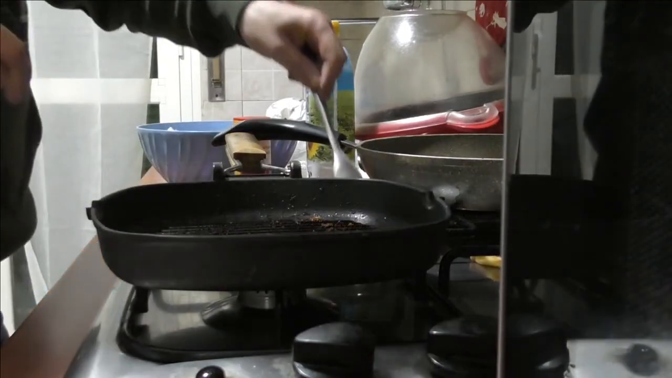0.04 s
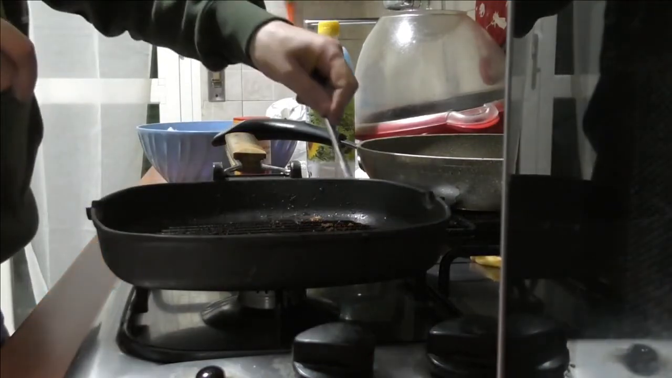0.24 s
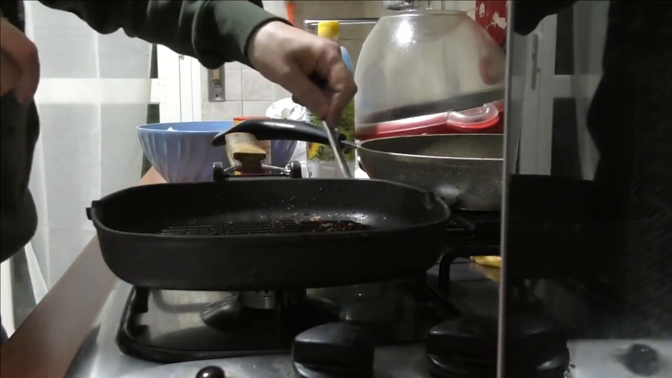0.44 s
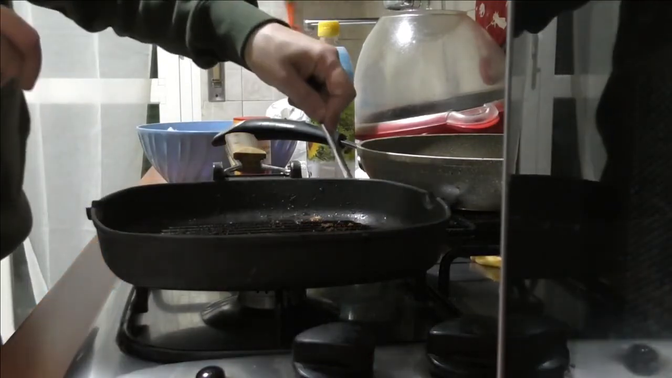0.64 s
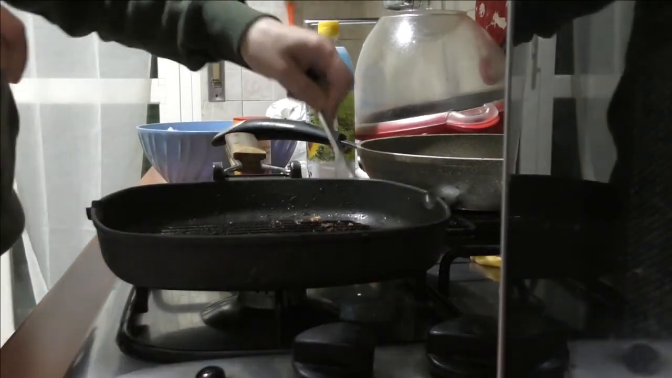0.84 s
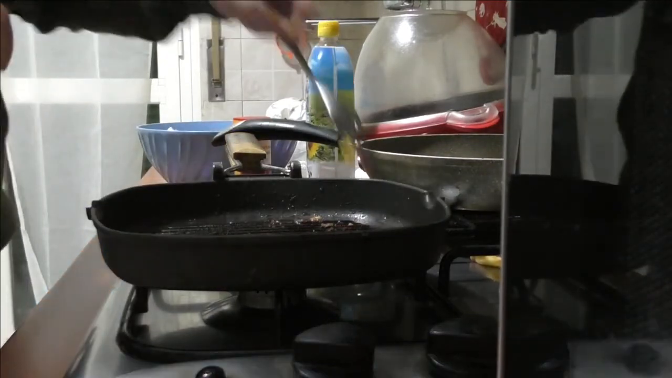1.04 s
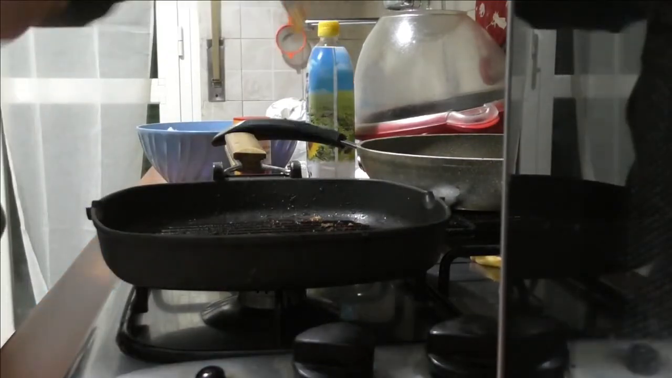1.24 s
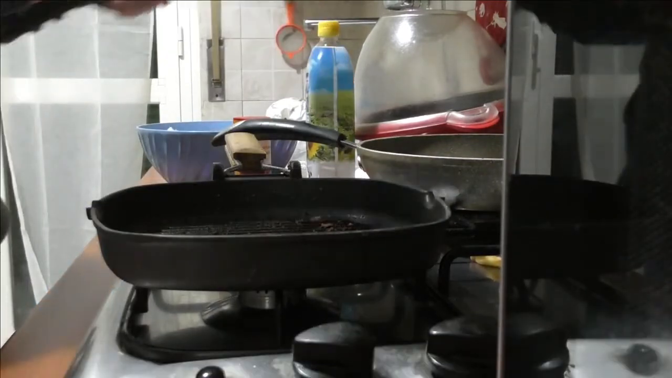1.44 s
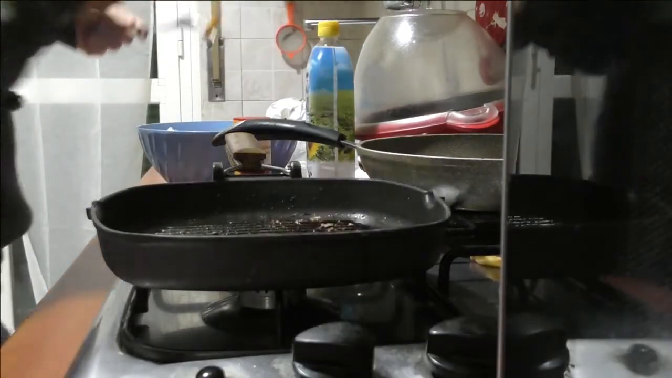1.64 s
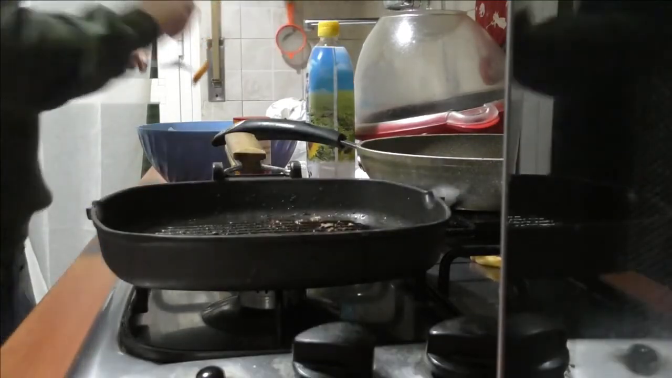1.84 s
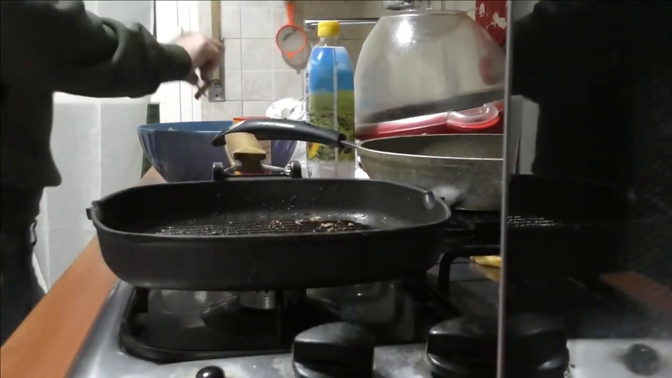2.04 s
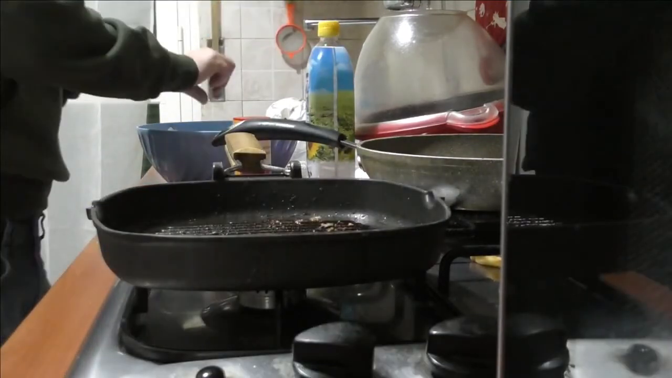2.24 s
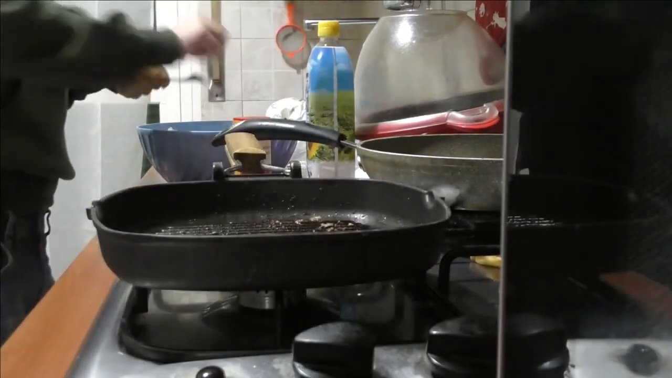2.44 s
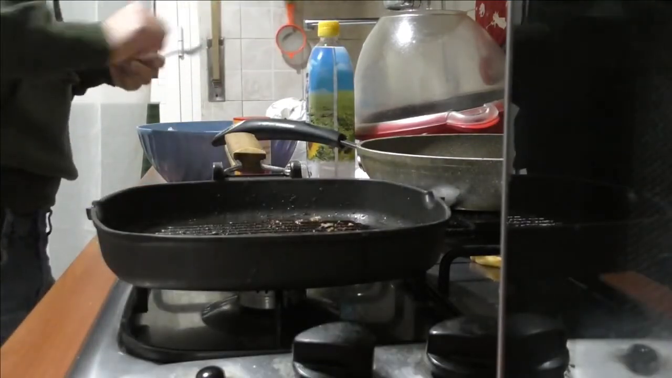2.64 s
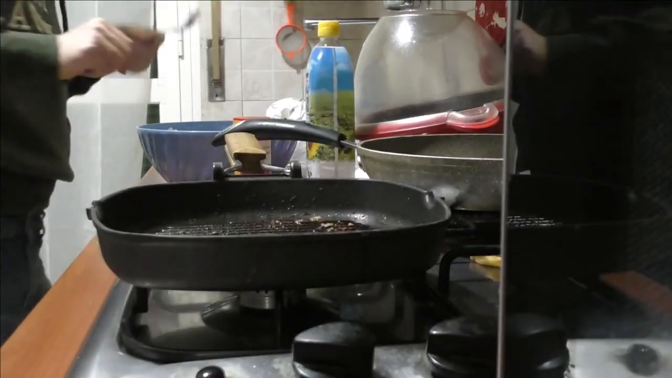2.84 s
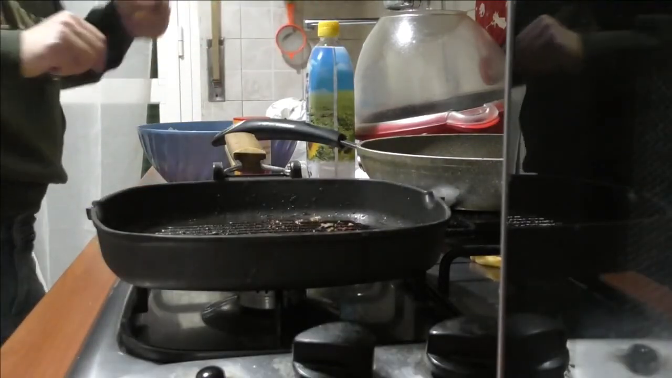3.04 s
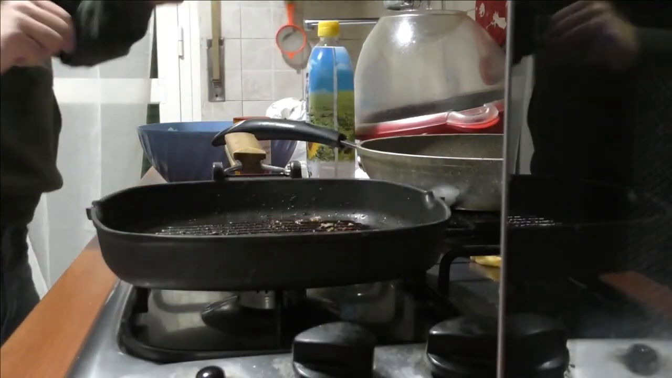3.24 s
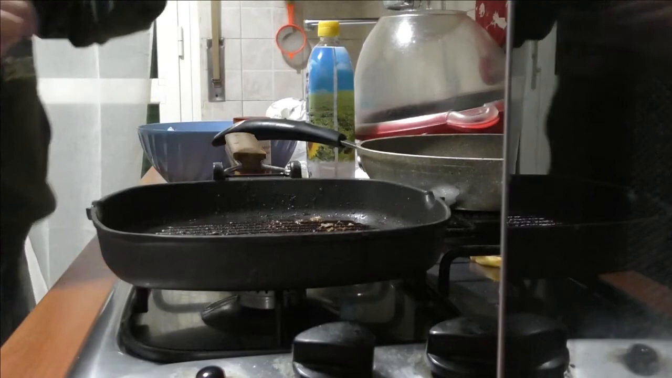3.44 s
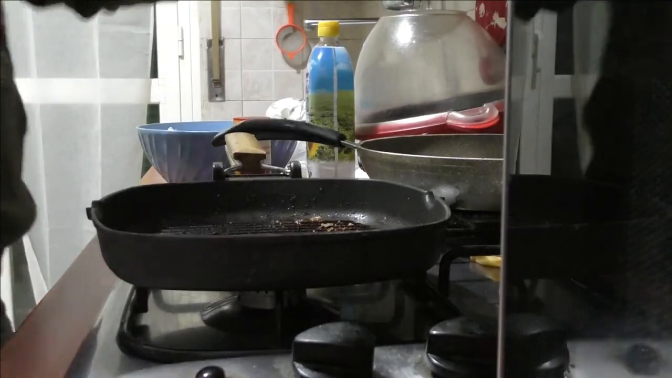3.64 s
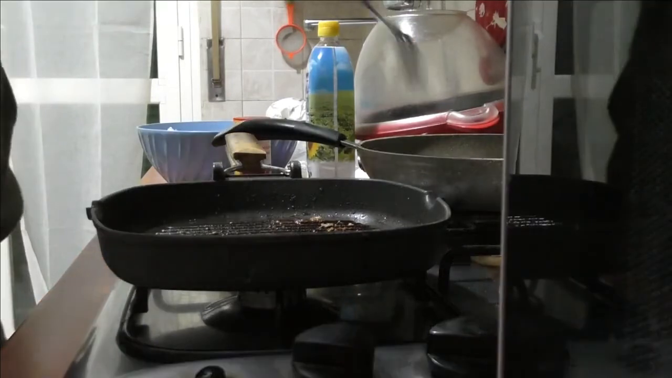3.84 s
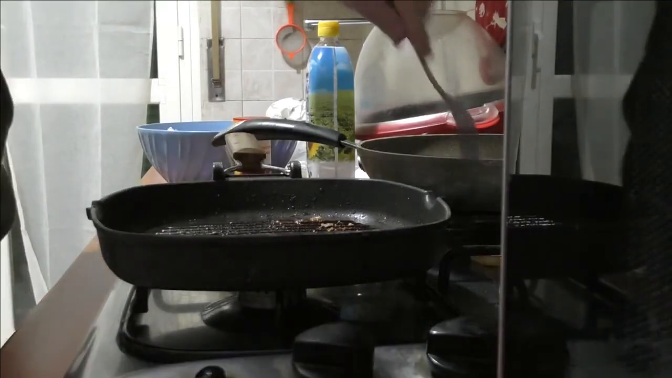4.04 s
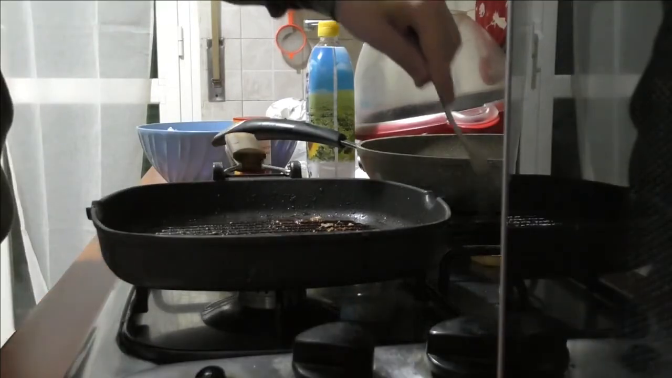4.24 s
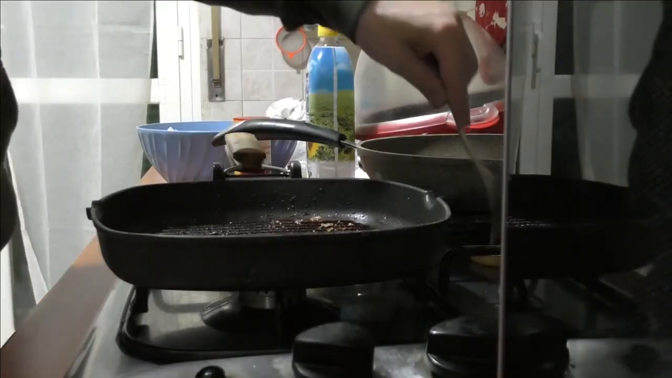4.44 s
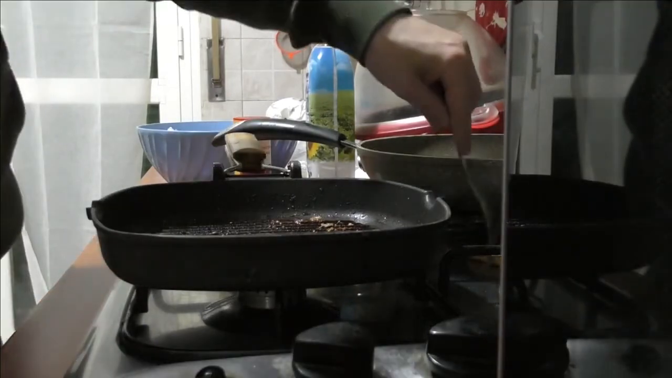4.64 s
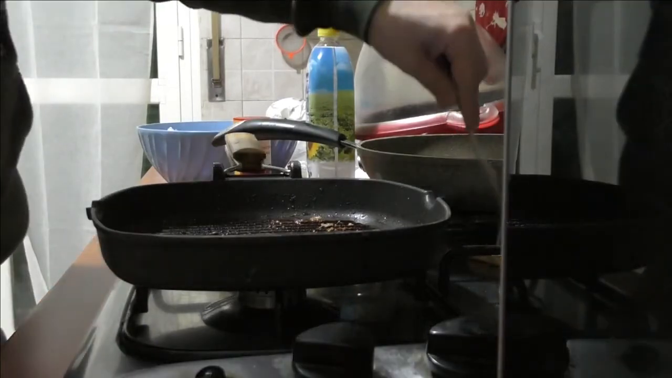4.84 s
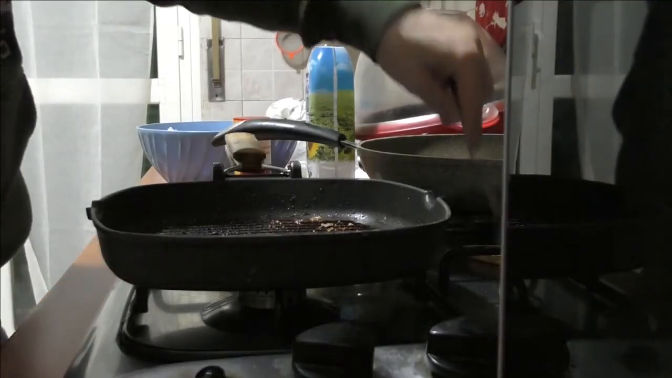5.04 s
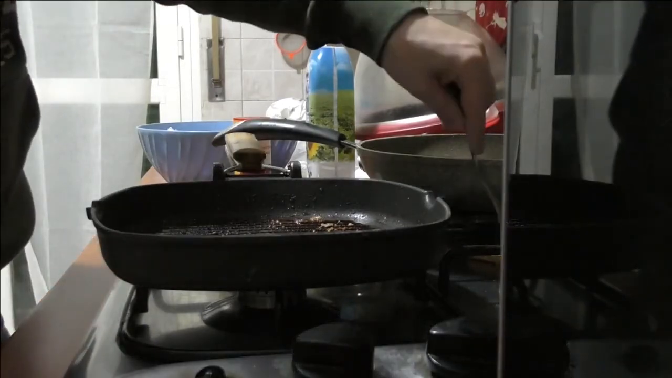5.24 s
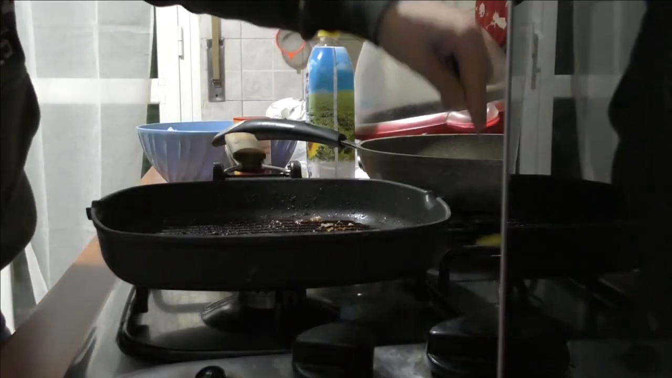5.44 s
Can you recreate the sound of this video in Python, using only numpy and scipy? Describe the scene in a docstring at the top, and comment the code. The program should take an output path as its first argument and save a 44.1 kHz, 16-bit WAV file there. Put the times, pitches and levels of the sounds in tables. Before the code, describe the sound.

In the first second, a fork prods food in a frying pan close by, with muffled clanks and low thuds, strongest at 0.2 and 0.6 seconds. From about 1.6 to 2.7 seconds, soft slippers thump and slide away, hissing and juddering slightly over a gritty floor. Something small and hard clacks at 2.2 seconds. The feet shuffle back from 3.4 to 4 seconds, with a brisk swish at 3.8. At about 4.6 and 5.1 seconds the fork knocks hard on the pan. These are the loudest sounds, each a steel crack with a short ring, a low boom from the stove and a brief echo off the tiles. A light tap follows at 5.3. Throughout, a wall clock ticks faintly once a second and the food gives rare tiny crackles over a very quiet low room rumble and hum. A faint thin whistle stops near 2.8 seconds.

```python
"""A fork prods food in a frying pan close by, with dull clanks, and near the end knocks twice on the pan:
a steel crack, a short ring and a boom from the hob. In between, the cook shuffles away and back, soft
soles thumping, hissing over grit and juddering, and something small clacks in the cook's hands.
The food crackles faintly, a wall clock ticks across the room, and the tiled kitchen rings briefly
over a low murmur, a hum and a thin whistle that stops halfway."""
import sys
import numpy as np
from scipy import signal
from scipy.io import wavfile

SR = 44100
rng = np.random.default_rng(int(sys.argv[2]) if len(sys.argv) > 2 else 0)


def master_out(mix):
    """Clip the mix to full scale and print it as 16-bit PCM to the path in sys.argv[1]."""
    frames = np.transpose(np.atleast_2d(mix))
    ceiling = np.clip(frames, -1, 1)
    pcm = np.round(ceiling * 32767).astype(np.int16)
    wavfile.write(sys.argv[1], SR, pcm)


N = 242837
T = np.arange(N) / SR
AGE = T[:SR]  # time since a contact [s]

# bright tick of a tiny contact: (frequency [Hz], level [dB])
BRIGHT_TICK = [(500, -33), (2500, 2.5), (5200, -7), (7500, -3), (11000, 2.5), (15500, -5.5)]
# a sole scuffing the floor: (frequency [Hz], level [dB])
SCUFF_SPECTRUM = [(100, -11.5), (350, 2), (650, -7.5), (1200, -1), (2200, 0), (3000, -1.5), (4500, -5),
                  (8000, -12), (12000, -15), (15500, -25)]
# stereo width of the room: (frequency [Hz], side over mid [dB])
ROOM_WIDTH = [(60, -11.5), (150, -7), (350, -10.5), (600, -14), (1150, -9), (2300, -8), (5000, -7),
              (7000, -21.5), (15000, -39)]


def knocks(ring_t60=0.071, rattle_db=-11, ring_in_room_db=-7, boom_rise_s=0.051):
    """Steel on pan: a crack, a short rattle and a damped ring, while the hob booms and the room answers."""
    # hard fork hits: (time [s], crack [dB], pan ring [dB], hob boom [dB], crack sent to the room [dB])
    hits = [(4.6468, -19, -22, -38.5, -21.5), (5.083, -18, -23, -31, -19.5)]
    # crack of steel on steel: (frequency [Hz], level [dB])
    crack_spectrum = [(60, -23), (250, 8), (600, 2.5), (1200, 1), (2700, 3.5), (3600, 0.5), (5000, -6.5),
                      (7000, -1.5), (10500, -2), (15500, -9)]
    # modes of the pan, damped by its load: (frequency [Hz], level [dB])
    pan_modes = [(232, 0.5), (272, -5), (446, 5), (610, -14), (722, -6), (882, 1.5), (1125, 5.5),
                 (1174, -10), (1480, 1), (1760, -25), (2030, 2.5), (2120, -28), (2450, 3), (2622, 2.5),
                 (2843, -3.5), (3147, 0), (3394, -1.5), (3545, 2.5), (6480, -34), (6870, -6)]
    # modes of the hob under the pan: (frequency [Hz], level [dB], t60 [s])
    hob_modes = [(100, 1.5, 0.43), (122, -3, 0.34), (225, -12, 0.26), (291.5, 1, 0.59), (422, 3, 0.49),
                 (440, -2.5, 0.63)]
    near, room_send, boom = np.zeros((3, N))
    for s, crack_db, ring_db, boom_db, room_db in hits:
        crack = burst(crack_spectrum, t60=0.059, click=0.29)
        rattle = amp(rattle_db) * burst(crack_spectrum, t60=0.077)
        pan = amp(ring_db) * blow(ring([(hz, db, ring_t60) for hz, db in pan_modes]))
        add(near, s, amp(crack_db) * (crack + rattle) + pan)
        add(boom, s, amp(boom_db) * blow(ring(hob_modes) * attack(boom_rise_s)))
        snap = blow(colour(impulse(), crack_spectrum))
        add(room_send, s, amp(room_db) * snap + amp(ring_in_room_db) * pan)
    return direct(near) + boom + kitchen(room_send, build_s=0.064)


def prods(press_db=-3, swell_db=9, slip_s=0.0105, slip_db=-2, ring_db=-6,
          give_s=0.00389, rock_s=0.0155, rock_db=-1):
    """Cushioned by food, the fork presses in, ticks, clanks dully and rocks the pan on its grate."""
    # fork jabs: (contact time [s], press before it [s], thud [dB], clank [dB], tick of the tines [dB])
    jabs = [(.2135, 0.0054, -38.5, -41, -38.5), (0.3747, 0.00087, -70, -60, -60),
            (0.559, 0.011, -51, -52.5, -60), (.6055, .012, -49, -37.5, -58),
            (.617, 0.0027, -35, -33, -45.5), (.79, .005, -60, -53, -60), (.835, 0.0041, -53.5, -52.5, -70),
            (.9747, .002, -59, -59.5, -75), (4.2156, .001, -65, -77, -61),
            (4.6048, 0.0077, -40.5, -40, -47.5), (4.639, 0.015, -38.5, -34, -60),
            (5.0457, 0.00303, -33.5, -35.5, -45), (5.276, .003, -48.5, -48, -46)]
    # thud of the pan on its grate: (frequency [Hz], level [dB])
    thud_spectrum = [(40, -22), (95, 6.5), (140, -1.5), (190, -5), (320, 2.5), (440, -1), (600, -17.5),
                     (1200, -51), (4000, -55)]
    # muffled clank of fork on pan: (frequency [Hz], level [dB])
    clank_spectrum = [(200, -16), (520, -8), (760, -1.5), (950, -3.5), (1500, 1.5), (1900, -6.5),
                      (2700, -9), (4500, -20.5), (15000, -29.5)]
    # ring after a clank: (frequency [Hz], level [dB], t60 [s])
    clank_modes = [(901.4, -9, 0.2), (1340, -0.5, 0.028), (1708, -15, 0.15)]
    contacts, rings = np.zeros((2, N))
    for s, press_s, thud_db, clank_db, tick_db in jabs:
        # the squeeze through the food grows louder until the fork meets the pan
        swell = (AGE < press_s) * amp(swell_db * np.minimum(AGE / press_s - 1, 0))
        press = unit_colour(swell * rng.standard_normal(SR), clank_spectrum)
        add(contacts, s - press_s, amp(clank_db + press_db) * press)
        add(contacts, s, amp(tick_db) * burst(BRIGHT_TICK, t60=0.097, click=0.29))
        for delay, db in [(0, clank_db), (slip_s, clank_db + slip_db)]:  # the tines slip and clank again
            add(contacts, s + delay, amp(db) * burst(clank_spectrum, t60=0.1))
            add(rings, s + delay, amp(db + ring_db) * blow(ring(clank_modes)))
        for k in range(3):  # the pan gives way and rocks, each thud softer
            thud = burst(thud_spectrum, t60=0.096, click=0.77)
            add(contacts, s + give_s + k * rock_s, amp(thud_db + k * rock_db) * thud)
    return rings + heard(contacts, direct_db=-2, room_db=-3, build_s=0.0051)


def steps(toe_s=0.025, toe_db=-3, toe_pitch=0.96, pat_db=-8, thump_in_room_db=-9):
    """Soft soles land heel then toe: a dull, mostly dry thump and a gritty pat that fills the room."""
    # heel landings: (time [s], level [dB], thump pitch [Hz])
    footfalls = [(1.583, -49.5, 516), (1.67, -53.5, 320), (1.744, -42, 275), (1.949, -49.5, 318),
                 (2.24, -47.5, 213), (3.407, -51, 235)]
    thumps, pats = np.zeros((2, N))
    for s, heel_db, heel_hz in footfalls:
        for delay, db, hz in [(0, heel_db, heel_hz), (toe_s, heel_db + toe_db, heel_hz * toe_pitch)]:
            add(thumps, s + delay, amp(db) * thump(hz, width_hz=326, t60=0.06))
            hardness = hz / 600  # a harder landing thumps higher and pats louder
            pat = burst(SCUFF_SPECTRUM, t60=0.022, click=0.27)
            add(pats, s + delay, amp(db + pat_db) * hardness * pat)
    return thumps + heard(pats + amp(thump_in_room_db) * thumps, direct_db=-3.5, room_db=6.5, build_s=0.0089)


def slides(grains_per_s=1500, grain_spread_db=0.5, smooth_gain=0.78, pivot_hz=2200):
    """Grit under a sliding slipper hisses with its speed, each stroke with its own brightness."""
    # foot strokes: (time at full speed [s], rise [s], hold [s], t60 [s], level [dB], tilt [dB/octave])
    strokes = [(1.745, 0.097, 0.031, 0.22, -48.5, -2.5), (1.845, 0.086, 0.017, 0.33, -45, 1),
               (2.038, 0.11, 0.21, 0.52, -46, 0.5), (2.53, 0.45, 0.034, 0.41, -57, -0.5),
               (3.47, 0.13, .02, 0.49, -47.5, -1), (3.571, 0.067, 0.0056, 0.47, -42.5, 1.5),
               (3.784, 0.054, 0.089, 0.58, -37, -0.5)]
    powers = np.array([(amp(db) * foot_speed(*timing)) ** 2 for *timing, db, _ in strokes]) + 1e-14
    total_power = powers.sum(axis=0)
    tilt_db = np.array([tilt for *_, tilt in strokes]) @ powers / total_power  # the loudest stroke leads
    sizes = amp(grain_spread_db * np.minimum(rng.exponential(1, N), 4))
    grit = sizes * rng.choice([-1, 1], N) * (rng.random(N) < grains_per_s / SR)
    friction = unit(colour(unit(grit) + smooth_gain * rng.standard_normal(N), SCUFF_SPECTRUM))
    hz, times, bands = signal.stft(friction, SR, nperseg=256)
    octaves = np.log2(np.maximum(hz, 500) / pivot_hz)[:, None]
    hiss = signal.istft(bands * amp(octaves * np.interp(times, T, tilt_db)), SR)[1][:N]
    return np.sqrt(total_power) * hiss


def foot_speed(top_s, rise_s, hold_s, t60):
    """Speed of a sliding foot, 0-1: it gathers, holds and dies away."""
    rise = np.clip(1 + (T - top_s) / rise_s, 0, 1) ** 1.23
    return rise * amp(-60 * np.maximum(T - top_s - hold_s, 0) / t60)


def swish(width_hz=1100, fade_s=0.02):
    """The last drag of the foot: friction noise whose resonance rises as the foot speeds up."""
    # path of the sweep: (time [s], level [dB], centre [Hz])
    sweep = [(3.69, -45.5, 1050), (3.75, -47, 1210), (3.785, -29.5, 2210), (3.82, -34, 2300),
             (3.87, -49, 2150)]
    times, db, hz = np.transpose(sweep)
    gate = np.clip(np.minimum(T - times[0], times[-1] - T) / fade_s, 0, 1)
    return gate * amp(np.interp(T, times, db)) * band(np.interp(T, times, hz), width_hz)


def judders(width_hz=135, pitch_drop=0.3, skew=0.86, swell_power=0.51):
    """The sole sticks and slips: a low, rough drone that swells and rises with the foot's speed."""
    # spells of grip: (start [s], length [s], level [dB], top pitch [Hz])
    grips = [(1.752, .075, -51.5, 297), (1.916, 0.376, -47, 392), (3.487, 0.088, -47.5, 313),
             (3.71, .29, -52, 397)]
    out = np.zeros(N)
    for s, length_s, db, top_hz in grips:
        progress = np.clip((T - s) / length_s, 0, 1)
        arch = abs(np.sin(np.pi * progress ** skew))  # peaks a little early
        hz = top_hz * (1 - pitch_drop * (1 - arch))
        out += amp(db) * arch ** swell_power * band(hz, width_hz)
    return out


def clack(at_s=2.225, db=-41.5, tick_db=-1):
    """Something small and hard clacks in the cook's hands: one short resonance and a bright tick."""
    body = thump(hz=1183, width_hz=160, t60=0.037)
    tick = amp(tick_db) * burst(BRIGHT_TICK, t60=0.089, click=0.33)
    out = np.zeros(N)
    add(out, at_s, amp(db) * (body + tick))
    return heard(out, direct_db=0.5, room_db=0, build_s=0.01)


def clock(first_s=0.478, tick_db=-51.5, tock_early_s=0.017, tock_db=1.7,
          nudge_s=0.012, nudge_db=-5, settle_s=0.015, settle_db=-3):
    """Each second the wheel is nudged, the hand jumps and then settles."""
    # click of the clockwork: (frequency [Hz], level [dB])
    tick_spectrum = [(300, -19), (900, -2), (1300, 7.5), (1900, 4), (3200, -3), (5500, -4), (8000, -2),
                     (11000, -6), (15000, -17)]
    out = np.zeros(N)
    for second in range(N // SR + 1):
        tock = second % 2  # every other beat comes a little early and louder
        s = first_s + second - tock * tock_early_s
        db = tick_db + tock * tock_db
        for delay, extra_db in [(-nudge_s, nudge_db), (0, 0), (settle_s, settle_db)]:
            tick = burst(tick_spectrum, t60=0.079) * attack(rise_s=0.0044)
            add(out, s + delay, amp(db + extra_db) * tick)
    return out


def crackle(pops_per_s=3, db=-67, spread_db=3.5):
    """Rare tiny ticks from the food in the pan."""
    sizes = amp(spread_db * np.minimum(rng.exponential(1, N), 3))
    pops = sizes * (rng.random(N) < pops_per_s / SR)
    return amp(db) * signal.fftconvolve(pops, burst(BRIGHT_TICK, t60=0.04, click=0.3))[:N]


def room_tone(side_db=3, hum_db=-69, whistle_db=-69.5, whistle_end_s=2.84, whistle_fade_s=0.088):
    """Murmur and hiss, a faint wavering hum and a thin whistle that flickers and stops."""
    # low murmur with a hissy top: (frequency [Hz], level [dB])
    murmur_spectrum = [(20, -56), (45, -1), (110, 0.5), (230, 0), (400, -4), (510, -6), (590, -17),
                       (790, -14.5), (980, -5), (2400, -10), (4800, -19.5), (7500, -21.5), (10500, -17.5),
                       (15500, -21.5)]
    # slow drift of the murmur: (time [s], level [dB])
    murmur_drift = [(0, -58.5), (1.3, -57), (2.7, -57.5), (3.1, -59.5), (4.3, -61.5)]
    murmur_db = np.interp(T, *np.transpose(murmur_drift))
    mid, side = (unit(colour(noise, murmur_spectrum)) for noise in rng.standard_normal((2, N)))
    murmur = amp(murmur_db) * stereo(mid, amp(side_db) * side, ROOM_WIDTH)
    hum = amp(hum_db) * band(hz=50, width_hz=9)
    whistle = band(hz=2520, width_hz=150)
    flicker = 1 + 0.7 * np.tanh(band(hz=12, width_hz=8))
    fade = np.clip((whistle_end_s - T) / whistle_fade_s, 0, 1)
    return murmur + hum + amp(whistle_db) * fade * unit(whistle * flicker)


def kitchen(x, build_s):
    """Dense reflections off the tiles build up and die band by band."""
    # decay of the room: (frequency [Hz], t60 [s])
    decay_times = [(100, 0.76), (400, 0.39), (1200, 0.54), (2600, 0.44), (5000, 0.4), (9000, 0.33),
                   (15000, 0.32)]
    # tone of the reflections: (frequency [Hz], level [dB])
    tail_spectrum = [(60, -12), (110, -1.5), (200, -6), (400, -1.5), (700, -3.5), (2500, -4), (6000, -5),
                     (10000, -4), (15000, -10.5)]
    hz, times, bands = signal.stft(rng.standard_normal((2, SR)), SR, nperseg=256)
    decay = amp(-60 * times / read(decay_times, hz)[:, None])
    tails = signal.istft(bands * decay, SR)[1][:, :SR] * attack(build_s)
    responses = [colour(tail / np.linalg.norm(tail), tail_spectrum) for tail in tails]
    mid, side = (signal.fftconvolve(x, response)[:N] for response in responses)
    return stereo(mid, side, ROOM_WIDTH)


def direct(x):
    """Near sound scatters off the microphone's housing a little differently at each port."""
    # stereo width of direct sound: (frequency [Hz], side over mid [dB])
    direct_width = [(100, -23), (400, -19), (900, -9), (1900, -10.5), (4500, -8.5), (7000, -20),
                    (10500, -36), (15000, -27)]
    scatter = rng.standard_normal(128) * np.hanning(256)[128:]
    side = signal.fftconvolve(x, scatter / np.linalg.norm(scatter))[:N]
    return stereo(x, side, direct_width)


def heard(x, direct_db, room_db, build_s):
    """A source's direct sound with the room's answer."""
    return amp(direct_db) * direct(x) + amp(room_db) * kitchen(x, build_s)


def stereo(mid, side, width):
    """Left and right at two close microphone ports, which differ only a little."""
    side = colour(side, width)
    return np.array([mid + side, mid - side])


def burst(spectrum, t60, click=0.):
    """One contact: a first click and the dense chatter that dies after it."""
    chatter = blow(rng.standard_normal(SR) * amp(-60 * AGE / t60))
    return blow(colour(chatter + click * blow(impulse()), spectrum))


def ring(modes):
    """Dying sines, each with a random polarity."""
    return sum(rng.choice([-1, 1]) * amp(db - 60 * AGE / t60) * np.sin(2 * np.pi * hz * AGE)
               for hz, db, t60 in modes)


def thump(hz, width_hz, t60):
    """A short noisy push into one broad resonance."""
    push = rng.standard_normal(SR) * amp(-60 * AGE / t60)
    return blow(resonate(resonate(push, hz, width_hz), hz, width_hz))


def band(hz, width_hz):
    """Noise in a steep-sided resonance, rms 1."""
    return unit(resonate(resonate(rng.standard_normal(N), hz, width_hz), hz, width_hz))


def resonate(x, hz, width_hz):
    """A resonance whose centre hz may be steady or glide."""
    carrier = np.exp(2j * np.pi * np.cumsum(hz * np.ones(len(x))) / SR)
    pole = np.exp(-np.pi * width_hz / SR)
    return 2 * (carrier * signal.lfilter([1 - pole], [1, -pole], x / carrier)).real


def colour(x, spectrum):
    """Minimum-phase EQ, so nothing rings ahead of an attack."""
    log_gain = np.log(amp(read(spectrum, abs(np.fft.fftfreq(4096, 1 / SR)))))
    taps = np.fft.ifft(np.exp(np.conj(signal.hilbert(log_gain)))).real
    return signal.fftconvolve(x, taps[:len(taps) // 2])[:len(x)]


def unit_colour(x, spectrum):
    """Colours white noise without changing its power."""
    return colour(x, spectrum) / np.linalg.norm(colour(impulse(), spectrum))


def read(points, hz):
    """Reads a curve on a log-frequency axis."""
    point_hz, values = np.transpose(points)
    return np.interp(np.log(hz + 1), np.log(point_hz), values)


def impulse():
    """A one-sample click."""
    return 1. * (AGE == 0)


def attack(rise_s):
    """A soft onset, 0-1."""
    return 1 - np.exp(-AGE / rise_s)


def amp(db):
    """Decibels to gain."""
    return 10 ** (np.asarray(db) / 20)


def unit(x):
    """Scales to rms 1."""
    return x / np.sqrt(np.mean(x ** 2) + 1e-20)


def blow(x):
    """Scales a short sound to the energy of 10 ms at rms 1."""
    return x * np.sqrt(SR / 100 / np.sum(x ** 2))


def add(mix, s, sound):
    """Mixes a sound in at time s."""
    part = mix[round(s * SR):][:len(sound)]
    part += sound[:len(part)]


def scene():
    """The pan is near; feet and clock are heard largely by way of the room."""
    return (knocks() + prods() + crackle() + steps() + clack()
            + heard(slides() + judders() + swish(), direct_db=-1, room_db=-2, build_s=0.0037)
            + heard(clock(), direct_db=6, room_db=10.5, build_s=0.018)
            + room_tone())


def record(dry, cutoff_hz=15900):
    """A steep low-pass trims the very top of the treble."""
    lowpass = signal.firwin(401, cutoff_hz, window=("kaiser", 8), fs=SR)
    return signal.oaconvolve(dry, lowpass[None], "same")


dry = scene()
out = record(dry)
master_out(out)
```